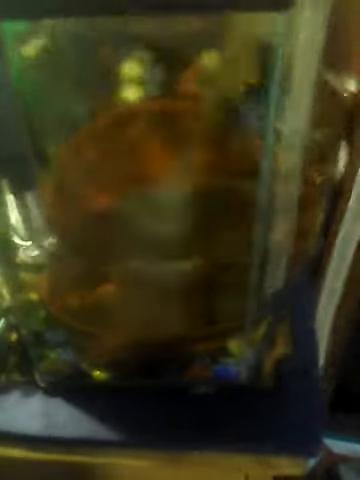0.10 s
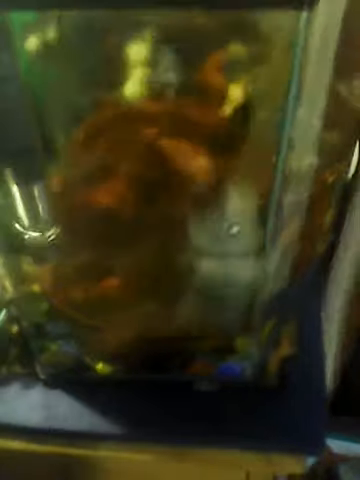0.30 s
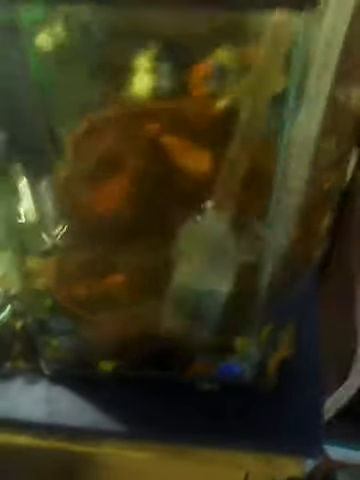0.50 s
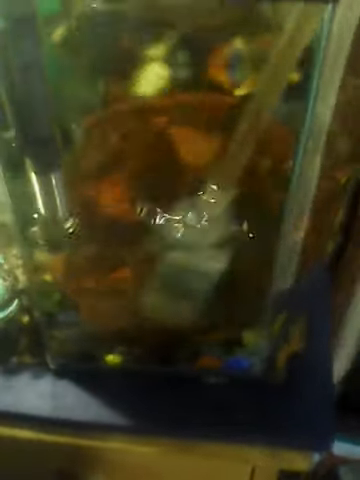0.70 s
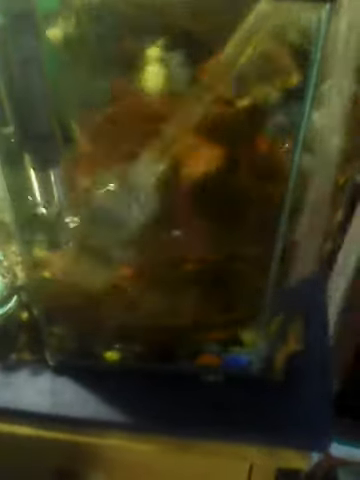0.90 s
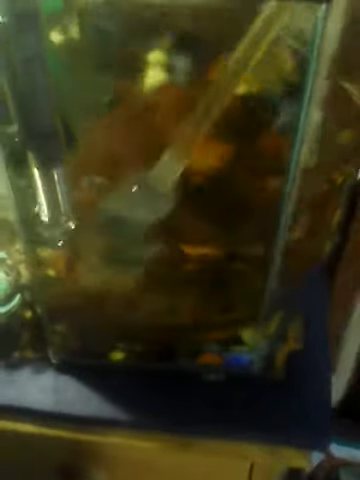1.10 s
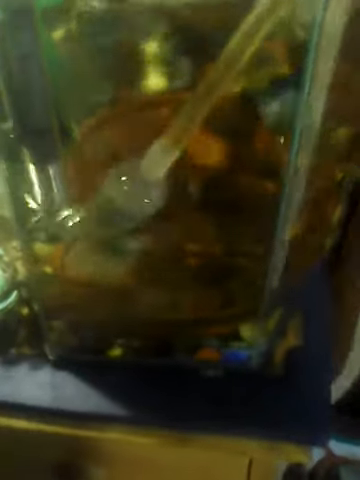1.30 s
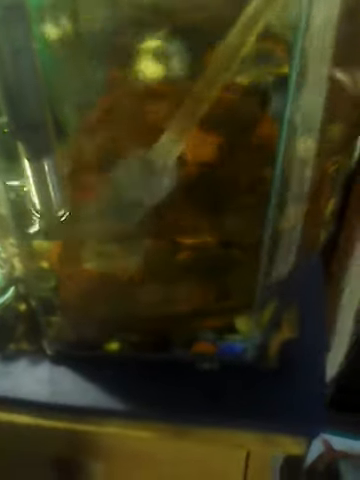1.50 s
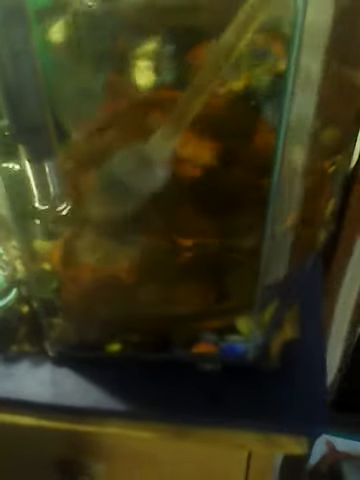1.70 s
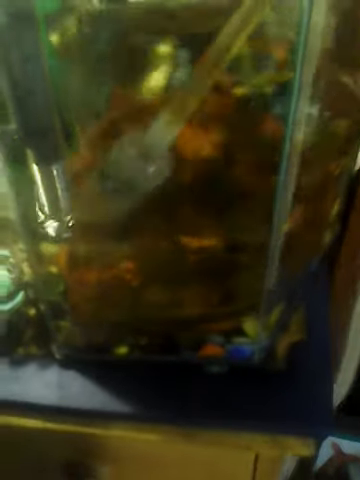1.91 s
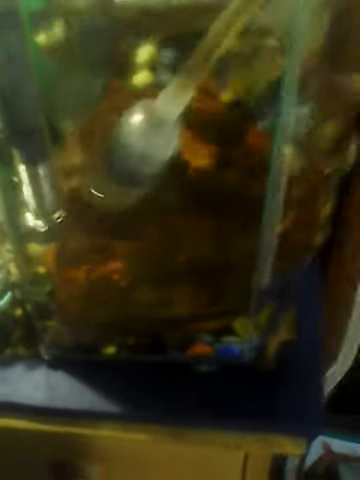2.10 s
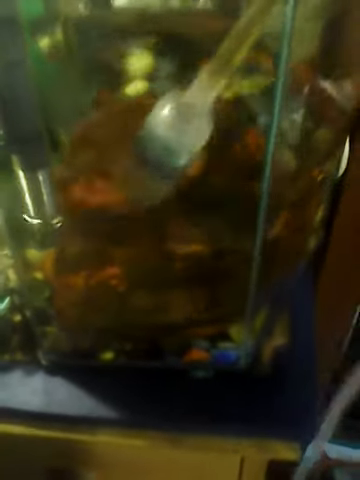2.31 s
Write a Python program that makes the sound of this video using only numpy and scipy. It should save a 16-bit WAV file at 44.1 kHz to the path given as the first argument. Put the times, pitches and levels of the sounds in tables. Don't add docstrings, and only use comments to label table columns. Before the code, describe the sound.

Hard glassy knocks and low thumps come in a quick irregular cluster as a tool stirs an aquarium, thin out after a second, and leave tiny bubbles and drips, heard close with slightly dulled treble indoors.

```python
import sys
import numpy as np
from scipy import signal
from scipy.fft import rfft, irfft
from scipy.io import wavfile
from scipy.ndimage import uniform_filter1d

SR = 44100
rng = np.random.default_rng(int(sys.argv[2]) if len(sys.argv) > 2 else 0)


def volts_from_db(level):
    exponent = np.asarray(level, float) / 20
    return 10 ** exponent


def digitize_waveform(pressure):
    field = np.atleast_2d(pressure).T
    bounded = np.clip(field, -1, 1)
    quanta = np.round(bounded * 32767).astype(np.int16)
    wavfile.write(sys.argv[1], SR, quanta)


N = 105840
EVENT_SAMPLES = 8192


def tilt(hz, tilt_db):
    top_hz = 2700 if tilt_db > 0 else 9000
    return tilt_db * np.log2(np.clip(hz, 600, top_hz) / 1500)


def shape(x, points, tilt_db=0.):
    hz = np.maximum(np.fft.rfftfreq(len(x), 1 / SR), 1)
    point_hz, point_db = np.array(points, float).T
    gain_db = np.interp(np.log(hz), np.log(point_hz), point_db) + tilt(hz, tilt_db)
    return irfft(rfft(x) * volts_from_db(gain_db), len(x))


def band(x, hz, width):
    edges = [hz - width / 2, hz + width / 2]
    return signal.sosfilt(signal.butter(1, edges, "bandpass", fs=SR, output="sos"), x)


def narrow_noise(count, hz, width):
    noise = rng.standard_normal(count)
    return unit(band(band(noise, hz, width), hz, width))


def high_pass(x, hz):
    return signal.sosfilt(signal.butter(2, hz, "highpass", fs=SR, output="sos"), x)


def unit(x):
    return x / np.sqrt(np.mean(x ** 2))


def fade(t, t60):
    return np.exp(-np.log(1000) * t / max(t60, .005))


def walk(n, rate):
    hold = int(SR / rate)
    levels = np.repeat(rng.standard_normal(n // hold + 1), hold)
    return uniform_filter1d(levels, hold)[:n]


def add(out, s, x):
    i = int(s * SR)
    out[i:i + len(x)] += x[:len(out) - i]


def knocks():
    # start_s, peak_db, tilt_db_per_octave, tail_t60_s, contact_s
    knock_table = [(0.179, -38, -4.5, 0.57, 0.0057), (0.1964, -20, -4.5, 0.22, 0.0057),
                   (0.345, -27.5, -2, 0.26, 0.0075), (0.437, -30, -6.5, 0.7, 0.0041),
                   (.471, -32, -4.5, 0.25, 0.0087), (0.487, -32, -3, 0.62, 0.0029),
                   (.511, -31.5, -5, 0.61, 0.0051), (0.55, -5, 4.5, .19, 0.0052),
                   (0.6136, -18, 8.5, 0.19, 0.0057), (0.871, -41, -2, 0.81, 0.0048),
                   (0.9375, -11.5, -3.5, 0.2, 0.0063), (1.075, -40.5, -1.5, 0.39, 0.0088),
                   (1.097, -25.5, 0, 0.21, 0.0043), (1.145, -41, 0, 0.18, 0.0042),
                   (1.215, -46, -1, 0.082, 0.0036), (1.278, -38.5, -9, 0.34, 0.01),
                   (1.334, -43.5, -4, 0.19, 0.0072), (1.537, -35.5, -8, 0.29, 0.0055),
                   (1.567, -33, -10.5, 0.21, 0.006), (1.612, -37, 2.5, 0.096, 0.0046),
                   (2.271, -30.5, -13.5, 0.17, 0.0056)]
    # pitch_hz, level_db, t60_s
    glass_modes = [(633, 5.5, 0.11), (751.8, -8, 0.28), (945, 2, 0.071), (1107, -8.5, 0.3),
                   (1295, -9.5, 0.17), (1447, -5.5, 0.05), (1978, 0.5, 0.13), (2170, -0.5, 0.048),
                   (2619, -2.5, 0.078), (3227, -3.5, 0.1), (3618, 2, 0.044), (4030, -14.5, .04),
                   (5000, 1.5, 0.036), (5857, -6.5, 0.075)]
    # frequency_hz, level_db
    tail_colour = [(120, -32.5), (300, 3.5), (500, -8.5), (750, 3.5), (2000, 4.5), (6500, -2.5), (9000, -2),
                   (14000, -13.5)]
    glass_db, scatter_db, tick_db, tail_db, rattle_db = -7.5, 2.5, -9, -15.5, -5.5
    grit_db, tail_rough_db = 3, -1
    tick_s, tail_hold_s, rattle_t60_s = 0.00098, 0.44, 0.042
    treble_fade = 0.85

    out, t = np.zeros(N), np.arange(EVENT_SAMPLES) / SR
    hz, mode_db, decay = np.array(glass_modes).T[:, :, None]
    split = signal.butter(1, 6400, fs=SR, output="sos")
    for s, db, tilt_db, t60, contact in knock_table:
        grit = rng.standard_normal(EVENT_SAMPLES) * volts_from_db(grit_db * walk(EVENT_SAMPLES, 1800))
        tick = np.diff(grit, prepend=0) * np.exp(-t / tick_s)
        press = (t / contact) ** .5 * np.exp(-(t / contact) ** 2)
        crack = unit(shape(grit, tail_colour, tilt_db)) * press

        level, detune, phase = rng.standard_normal((3, len(glass_modes), 1))
        swing = np.sin(2 * np.pi * hz * (1 + 0.0099 * detune) * t + 3 * phase)
        modes = np.exp(-np.log(1000) * t / decay) * swing
        mode_gain = volts_from_db(mode_db + scatter_db * level + tilt(hz, tilt_db))
        ring = (mode_gain * modes).sum(axis=0) * np.minimum(t / 0.0015, 1)

        noise = rng.standard_normal(EVENT_SAMPLES)
        rattle = unit(irfft(rfft(noise) * rfft(ring * fade(t, rattle_t60_s)), EVENT_SAMPLES))
        tail = unit(shape(noise, tail_colour, 1.46 * tilt_db)) + volts_from_db(rattle_db) * rattle
        tail = tail * volts_from_db(tail_rough_db * walk(EVENT_SAMPLES, 180))
        low = signal.sosfilt(split, tail)
        tail = low * fade(t, t60) + (tail - low) * fade(t, treble_fade * t60)
        tail = tail * np.minimum(t / 0.0011, 1) / (1 + (t / tail_hold_s) ** 6)

        knock = 0.78 * crack / np.abs(crack).max()
        knock += volts_from_db(tick_db - 5.5 + 0.9 * tilt_db) * tick
        knock += volts_from_db(glass_db) * ring / np.abs(ring).max()
        knock += volts_from_db(tail_db) * tail
        add(out, s, volts_from_db(db) * knock)
    return high_pass(out, 219)


def pings():
    # start_s, peak_db, pitch_hz, t60_s
    ping_table = [(0.1975, -22.5, 1290, 0.03), (.1965, -31.5, 1960, 0.045), (.197, -30.5, 867, 0.086),
                  (.346, -36.5, 2130, .04), (.346, -46, 1900, .04), (0.437, -37.5, 1340, 0.035),
                  (.509, -32, 1950, .025), (.512, -42, 647, .07), (.5515, -4, 2723, 0.016),
                  (.6145, -27, 3480, 0.035), (.948, -27, 748.4, .25), (.553, -25, 1116, .15),
                  (.553, -26, 720, .13), (1.612, -45, 2810, 0.035), (.551, -20, 2044, .045),
                  (0.55, -12.5, 6284, 0.012), (.552, -23, 2267, .12), (0.9387, -20.5, 1380, 0.037),
                  (.938, -29, 945, 0.044), (0.937, -25, 1830, 0.1), (.94, -18, 2380, 0.024),
                  (1.097, -36.5, 3710, 0.037), (1.097, -38, 6100, 0.027), (1.568, -46, 1894, 0.064),
                  (2.272, -49.5, 2070, 0.086), (2.271, -42, 1016, 0.069)]
    rise_s = 0.00031
    out, t = np.zeros(N), np.arange(EVENT_SAMPLES) / SR
    for s, db, hz, t60 in ping_table:
        swell = (1 - np.exp(-t / rise_s)) * fade(t, t60)
        add(out, s, volts_from_db(db) * swell * np.sin(2 * np.pi * hz * t))
    return out


def thumps():
    # start_s, peak_db, pitch_hz, length_s
    thump_table = [(0.159, -33.5, 273, 0.0045), (0.174, -40.5, 283, 0.0051), (0.198, -19.5, 288, 0.0048),
                   (0.2085, -34, 328, 0.0032), (0.214, -19.5, 258, 0.0061), (0.24, -42, 270, 0.005),
                   (0.261, -39, 260, 0.0071), (0.345, -29.5, 334, 0.007), (0.3655, -17.5, 332, 0.007),
                   (0.381, -32, 257, 0.0082), (0.399, -34, 274, 0.0069), (0.44, -30, 353, 0.0071),
                   (0.4615, -24, 269.6, 0.0046), (0.472, -12, 268, 0.0046), (0.4805, -22, 286, 0.0046),
                   (0.514, -33.5, 270, 0.0055), (0.539, -37, 300, 0.0017), (0.555, -28, 338, 0.013),
                   (0.559, -25.5, 227, 0.011), (0.578, -22, 264, 0.0043), (0.589, -25, 261, 0.007),
                   (0.603, -29, 269, 0.0064), (0.627, -34, 254, 0.01), (0.748, -39.5, 292, 0.0043),
                   (0.788, -46, 271, 0.0084), (0.868, -38.5, 338, 0.0073), (0.93, -33, 323, 0.0043),
                   (0.943, -13, 270.8, 0.0068), (0.958, -27.5, 331, 0.0061), (0.967, -38, 242, 0.004),
                   (0.987, -33, 250, 0.0054), (1.008, -44, 286, 0.0028), (1.042, -40.5, 301, 0.0052),
                   (1.094, -30.5, 360, 0.0046), (1.124, -39, 345, 0.0049), (1.143, -40, 358, 0.0041),
                   (1.187, -45.5, 296, 0.006), (1.209, -43, 315, 0.0076), (1.285, -43.5, 292, 0.0051),
                   (1.536, -27, 304, 0.0051), (1.557, -29.5, 297, 0.0084), (2.27, -30, 319, 0.0028)]
    # start_s, peak_db, pitch_hz, length_s
    slosh_table = [(0.724, -46.5, 313, 0.0099), (0.838, -48, 340, 0.014), (0.813, -46, 362, 0.006),
                   (0.89, -39, 290, 0.0046), (0.903, -47, 265, 0.0055), (1.074, -35.5, 365, 0.0065),
                   (1.242, -48, 327, 0.0048), (1.32, -48, 300, 0.0073), (1.353, -48.5, 298, 0.0052),
                   (1.432, -47, 257, 0.0092), (1.597, -47, 308, 0.0082), (1.697, -52, 326, 0.006),
                   (1.765, -53, 300, 0.014)]
    echo_s, echo_db = 0.0224, -19.5
    wash_db, wash_t60_s = -15, 0.19
    rumble_db, rumble_t60_s = -31, 0.82

    out, wash, rumble = np.zeros((3, N))
    t = np.arange(EVENT_SAMPLES) / SR
    rise = np.minimum(t / 0.0037, 1) * (1 - t / t[-1])
    for s, db, hz, length in list(thump_table) + list(slosh_table):
        u = t / max(length, .001)
        swell = u ** 1.1 * np.exp(1 - u ** 1.27)
        body = swell * np.sin(2 * np.pi * hz * t * (1 - 2.14 * t))
        echo = np.roll(body, int(echo_s * SR))
        add(out, s, volts_from_db(db) * (body + volts_from_db(echo_db) * echo))
        add(wash, s, volts_from_db(db + wash_db) * rise * fade(t, wash_t60_s))
        add(rumble, s, volts_from_db(db + rumble_db) * rise * fade(t, rumble_t60_s))
    noise = rng.standard_normal(N)
    wash *= unit(band(band(noise, 295, 250), 295, 250))
    rumble *= unit(band(band(noise, 95, 130), 95, 130))
    return out + wash + rumble


def drips():
    # start_s, peak_db, pitch_hz, t60_s
    drip_table = [(0.286, -49.5, 4170, 0.026), (.488, -29.5, 1930, 0.062), (0.671, -54, 1980, 0.049),
                  (0.781, -48.5, 6100, 0.035), (0.902, -43.5, 2380, 0.051), (0.907, -51, 5240, 0.03),
                  (1.253, -40.5, 2120, 0.024), (1.29, -48.5, 2460, 0.065), (1.435, -52, 3140, 0.058),
                  (1.51, -54, 1320, 0.09), (1.622, -50.5, 1497, 0.19), (1.639, -46, 3070, 0.057),
                  (1.471, -55, 5920, 0.038), (1.652, -46.5, 7100, 0.04), (1.765, -54, 1540, 0.15),
                  (1.808, -53.5, 4770, 0.026), (1.839, -46.5, 2290, 0.064), (1.916, -52.5, 5250, 0.034),
                  (1.945, -56, 1970, 0.037), (1.972, -49, 1670, 0.19), (2.001, -56.5, 1536, 0.28),
                  (2.007, -53, 1660, 0.097), (2.0, -54, 1220, 0.071), (2.108, -57, 1210, 0.081),
                  (2.144, -56.5, 2790, 0.039), (2.362, -48.5, 2100, 0.044), (2.012, -44, 4860, 0.046),
                  (2.04, -54, 826, 0.1), (2.08, -53, 1184, 0.14), (2.092, -51.5, 4200, 0.024),
                  (2.149, -42.5, 6100, 0.045), (2.195, -54.5, 3450, 0.039), (2.359, -46.5, 1764, 0.16),
                  (2.385, -46, 2140, 0.086), (2.387, -49, 3030, .04)]
    glide, wash_db, rise_s = .25, -8.5, 0.00069
    out, t = np.zeros(N), np.arange(EVENT_SAMPLES) / SR
    for s, db, hz, t60 in drip_table:
        tone = np.sin(2 * np.pi * hz * t * (1 + glide * t)) * fade(t, t60 * 0.48)
        wash = narrow_noise(EVENT_SAMPLES, 1.016 * hz, 0.25 * hz) * fade(t, t60 * 1.78)
        add(out, s, volts_from_db(db) * (1 - np.exp(-t / rise_s)) * (tone + volts_from_db(wash_db) * wash))
    return out


def spray():
    # start_s, peak_db, pitch_hz
    spray_table = [(.322, -44, 8500), (.41, -44, 10000), (0.6142, -18.5, 9300), (.775, -49, 13060),
                   (2.272, -43.5, 5170), (0.898, -50, 8990), (1.003, -39, 12500), (1.06, -49, 10500),
                   (1.401, -52, 13000), (1.587, -54, 10000), (1.762, -54, 9890), (2.01, -46, 11000),
                   (2.15, -47, 10500), (2.19, -41.5, 12900), (2.375, -41, 12050)]
    out, t = np.zeros(N), np.arange(EVENT_SAMPLES) / SR
    for s, db, hz in spray_table:
        tick = narrow_noise(EVENT_SAMPLES, hz, .3 * hz) * fade(t, .05)
        add(out, s, volts_from_db(db - 9.5) * tick)
    return out


def trickle(count=260):
    # pitch_hz, width_hz, level_db
    hum_bands = [(2050, 210, -74.5), (3410, 390, -72.5), (5170, 440, -75.5)]
    # frequency_hz, level_db
    hush_colour = [(25, -15), (60, 8), (125, 3), (300, -0.5), (1000, -11.5), (2000, -17), (5000, -18.5),
                   (8000, -13)]
    fizz_db, fizz_spread_db, flicker_db, hush_db = -64.5, 2.5, 2, -59

    out, t = np.zeros(N), np.arange(1500) / SR
    for when, pitch, cycles, strength in rng.random((count, 4)):
        hz = 500 * 2 ** (5.1 * pitch)
        tone = np.sin(2 * np.pi * hz * t * (1 + 4 * t)) * np.exp(-t * hz / (3 + 8 * cycles))
        level_db = fizz_db - fizz_spread_db * np.log(1 - strength)
        add(out, when * (N - 1) / SR, volts_from_db(level_db) * tone)
    for hz, width, db in hum_bands:
        hum = unit(band(rng.standard_normal(N), hz, width))
        out += volts_from_db(db + 3.8 * walk(N, 9.23)) * hum
    hush = np.zeros(N)
    for hz in 30 * 2 ** np.arange(0, 9, .5):
        hush += band(rng.standard_normal(N), hz, hz / 2) * volts_from_db(flicker_db * walk(N, 14))
    return out + volts_from_db(hush_db) * unit(shape(hush, hush_colour))


def scene():
    return (knocks() + pings() + thumps() + drips() + spray() + trickle())[None]


def band_limit(x):
    return signal.sosfilt(signal.butter(12, 15960, fs=SR, output="sos"), x)


def record(dry):
    # frequency_hz, level_db
    mic_response = [(20, -1), (6300, 0), (7300, -8.5), (8200, -23), (12000, -24), (15750, -32),
                    (16000, -75)]
    heard = high_pass(shape(dry[0], mic_response), 77)
    hiss = volts_from_db(-90.5) * rng.standard_normal(N)
    return band_limit((heard + hiss)[None])


dry = scene()
out = record(dry)
digitize_waveform(out)
```